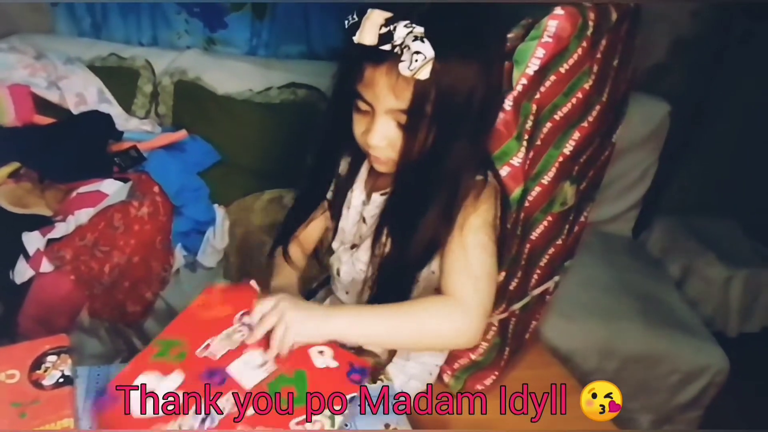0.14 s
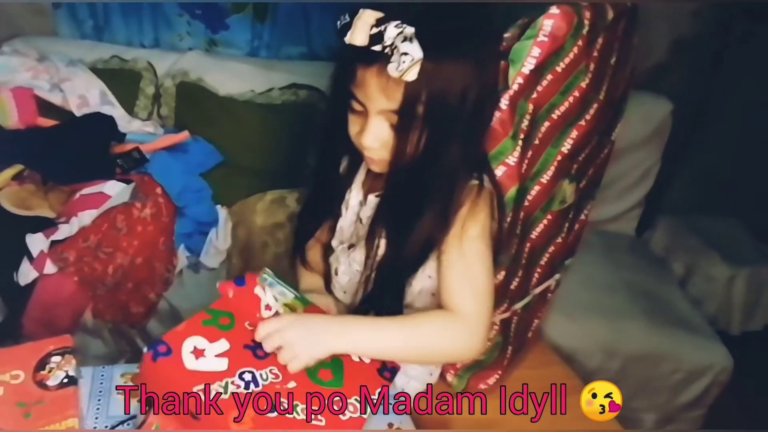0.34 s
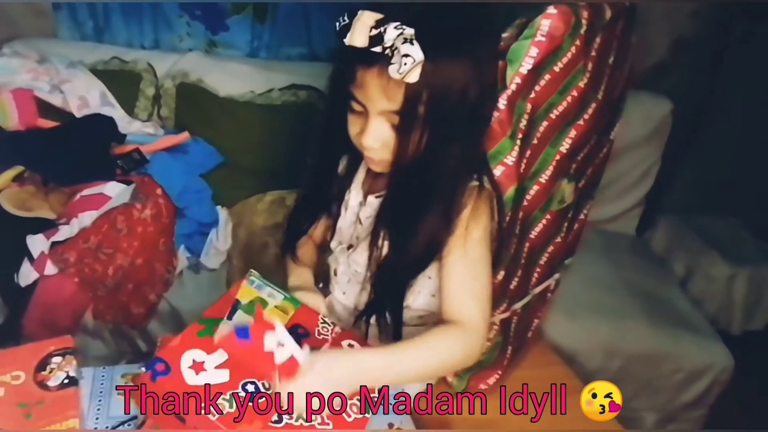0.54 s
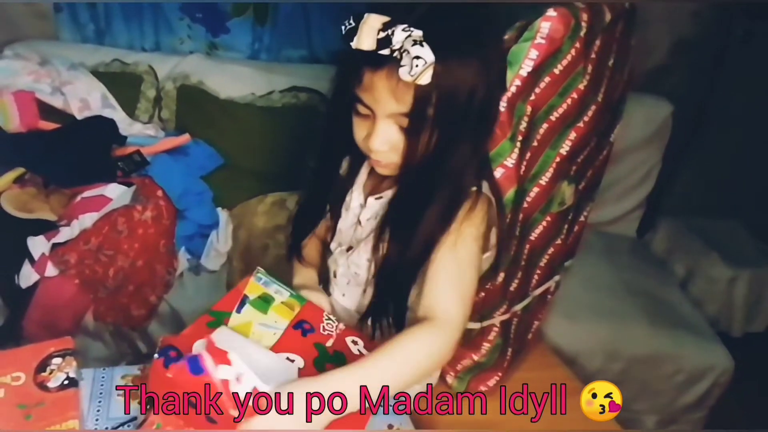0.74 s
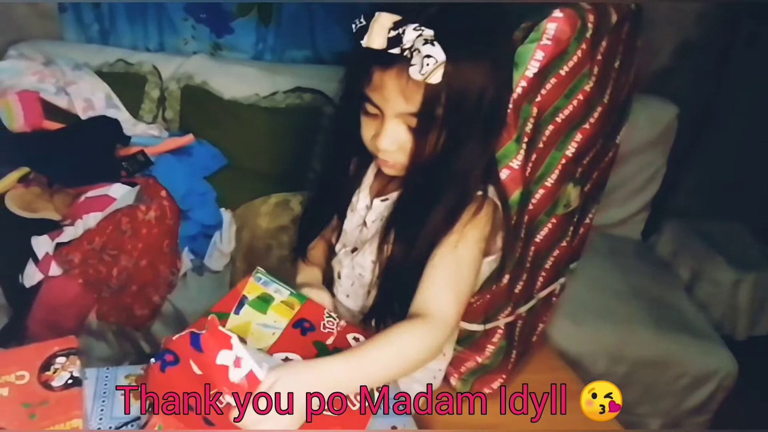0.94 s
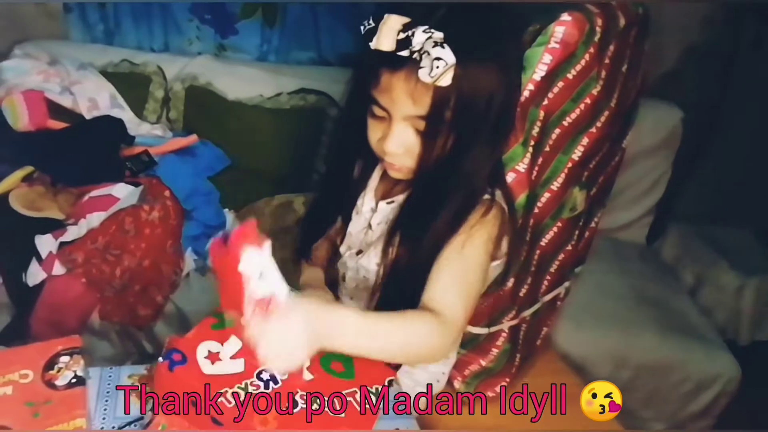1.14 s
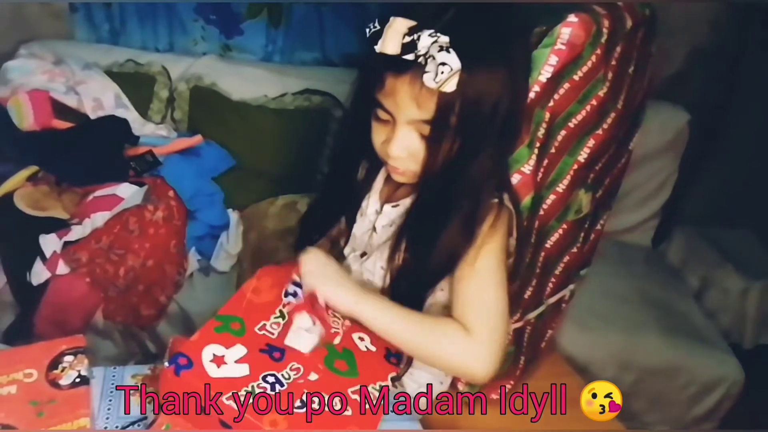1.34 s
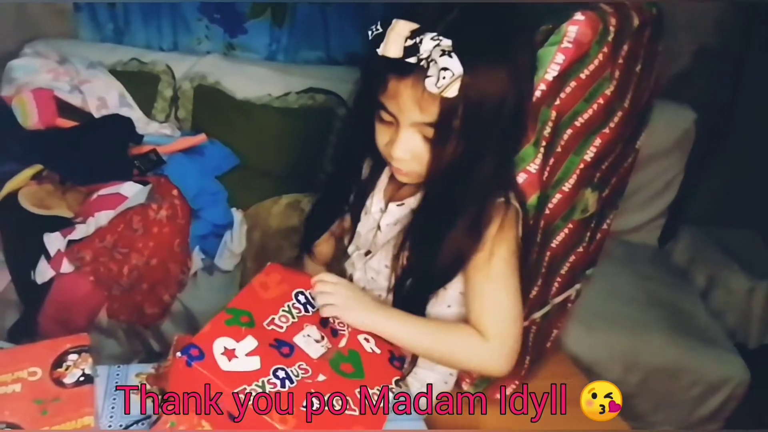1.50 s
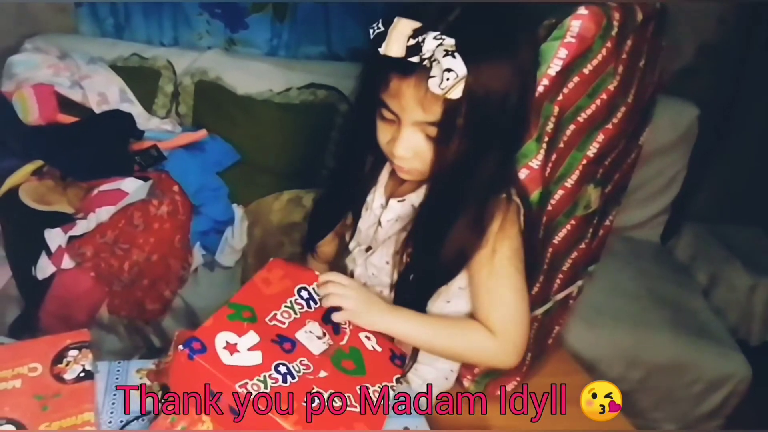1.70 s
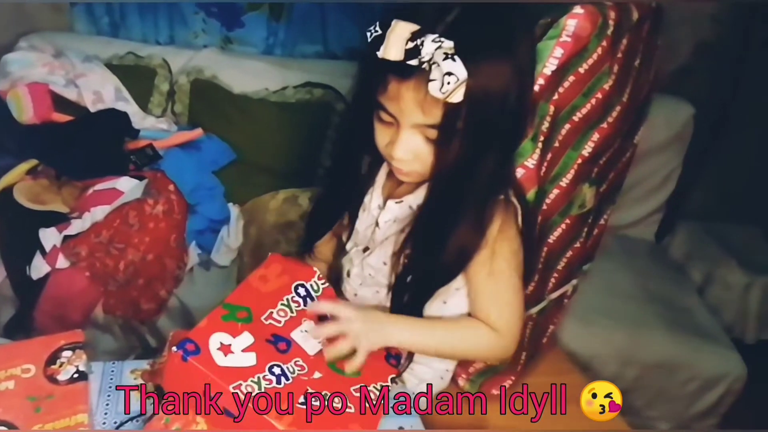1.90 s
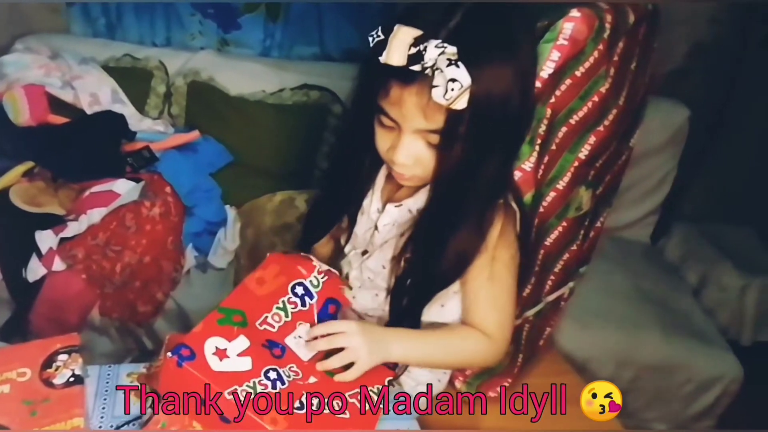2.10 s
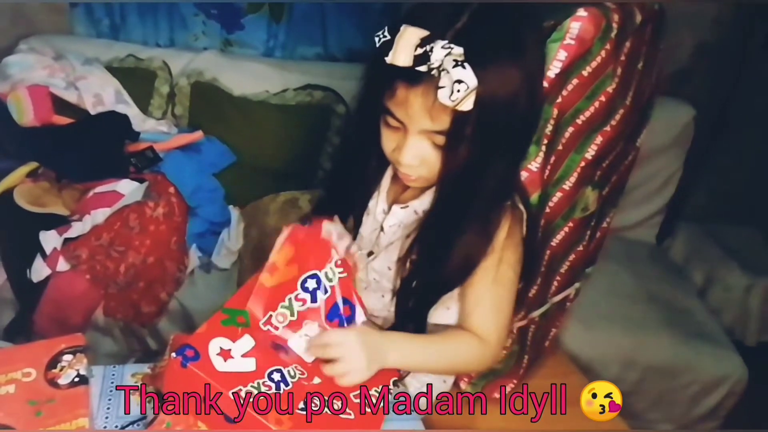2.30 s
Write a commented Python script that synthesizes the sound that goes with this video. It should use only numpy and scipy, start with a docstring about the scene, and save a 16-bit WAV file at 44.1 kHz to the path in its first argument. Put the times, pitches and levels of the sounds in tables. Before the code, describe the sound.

Wrapping paper is torn from a gift box, close and bright in a small soft room. Light crinkling leads to a loud, snapping rip at 0.25-0.3 s, then hollow pops around 0.4-0.55 s and crackly tears until 0.8 s. Another pull comes at 0.9-1.15 s, brief crinkles at 1.4-1.6 s, a faint rub from 1.6 s, a dull pop at 2.0 s and small crackles near 2.15 s. Low steady hush.

```python
"""Gift wrap torn off a box

Wrapping paper is ripped off a gift box by hand, close by in a small furnished room.
Each pull is a dense run of random fibre snaps, coloured as a bright fizz and a lower crinkle.
Single creases crack as short rings with a noisy tick; soft pops make the loose sheet flex over the box,
and buckles add hollow decaying tones. A fingertip rub sings faintly late on, and a steady hush lies below."""
import sys
import numpy as np
from scipy import signal
from scipy.fft import rfft, irfft, next_fast_len
from scipy.io import wavfile
from scipy.ndimage import uniform_filter1d

SR = 44100
rng = np.random.default_rng(int(sys.argv[2]) if len(sys.argv) > 2 else 0)


def store_wav(level_fs):
    """Save 16-bit WAV to argv[1]."""
    pcm = np.round(np.clip(np.atleast_2d(level_fs), -1, 1) * 32767)
    wavfile.write(sys.argv[1], SR, pcm.T.astype(np.int16))


N = 103635
T = np.arange(N) / SR

# Levels in the event tables are before the layer trims (*_TRIM_DB), room and ports.
# Pulls on the paper: (start [s], end [s], fizz level midway [dB], swell from start to end [dB],
# crinkle against fizz [dB], extra fizz above SPLIT_HZ [dB], left over right [dB])
PULLS = [(-.01, 0.117, -37, -2, -3.5, -2, 2), (0.142, 0.243, -35, 5, -3.5, 1, 3.5),
         (0.2447, 0.29, -18.5, -2, -6.5, -2.5, 0), (0.295, 0.388, -35, -8, -1.5, -2, -0.5),
         (0.417, 0.469, -39, 8.5, 2, -10, 0), (0.488, 0.605, -32.5, 5.5, 0, 0.5, -1),
         (0.562, 0.66, -31.5, 9, -6.5, 4, -1.5), (0.677, 0.823, -34.5, -6.5, -5, 3, -0.5),
         (0.915, 1.113, -47.5, 17, 2.5, -4, 0), (1.07, 1.155, -30, 11, -6, 1, -0.5),
         (1.38, 1.441, -47, 16.5, -2, -0.5, 0.5), (1.459, 1.495, -34, 2.5, -5, -9, 1),
         (1.512, 1.52, -30, 8.5, -3.5, -8, -1.5), (1.574, 1.613, -47, 5.5, 1.5, -6, 1),
         (1.708, 2.127, -49.5, 7.5, -5.5, -3, -0.5), (2.125, 2.185, -38, -10, -8.5, -2.5, 1.5),
         (2.175, 2.35, -53, 8, -3.5, -1, 1.5)]
# Single creases cracking: (time [s], level [dB], ring pitch [Hz], left over right [dB])
CRACKS = [(0.1594, -24, 8300, 6), (0.191, -26.5, 3170, -8), (0.232, -24, 2940, -7), (0.2494, -16, 9800, 23),
          (0.2526, -23, 8800, -29), (0.2622, -7.5, 6170, -5), (0.2763, -15, 2580, 1),
          (0.2834, -4.5, 6040, -7), (0.286, -13, 8600, 6), (0.2944, -13, 6250, 3), (0.4945, -15, 2980, -2),
          (0.5594, -15.5, 9200, 4), (0.5938, -18.5, 8300, 5), (0.627, -14, 9990, -4),
          (0.648, -13, 9800, -2), (.938, -30.5, 2540, 4.5), (.958, -21, 9500, 0), (0.9789, -26, 2360, 5),
          (1.416, -34, 3000, 4), (1.4304, -22.5, 3050, -5), (1.4495, -28.5, 2600, -5),
          (1.7146, -37, 1430, 1), (1.9268, -33, 2830, -7), (2.0076, -38, 2610, 3.5),
          (2.077, -34.5, 8750, 10), (2.133, -24, 9500, 14.5), (2.1577, -33, 2320, 4),
          (2.172, -21.5, 9360, 4.5)]
# The loose sheet flexing: (start [s], end [s], level midway [dB], swell from start to end [dB])
FLEXES = [(0, 0.288, -47, 8), (0.356, 0.544, -33.5, 13.5), (0.6, 0.777, -46.5, 21.5),
          (0.827, 1.025, -36.5, 5.5), (1.06, 1.189, -44, 0), (1.333, 1.548, -41, 8),
          (1.6, 1.629, -35.5, -6), (1.946, 2.067, -41.5, 12), (2.272, 2.283, -48.5, -17)]
# The sheet buckling against the box: (time [s], level [dB], pop pitch [Hz])
BUCKLES = [(.159, -22.5, 700), (.190, -23.5, 690), (.396, -25.5, 830), (.438, -22, 740), (.45, -25, 735),
           (.467, -21, 507), (0.4794, -20, 585), (0.4931, -16, 613), (.529, -19, 545), (.539, -16.5, 710),
           (.829, -27, 605), (.904, -34, 685), (0.9508, -26.5, 605), (0.9706, -20, 735), (1.0228, -21, 700),
           (1.532, -24.5, 450), (1.6, -28, 633), (2.0077, -13.5, 550), (2.052, -28, 795), (2.112, -29, 800)]
# Hollow ring of the box: (pitch [Hz], level against the pop [dB], time to fall 60 dB [s])
BOX_RING = [(274, -25, 0.075), (465, -15.5, 0.13), (541, -24, 0.082), (720, -15.5, 0.027)]
# A fingertip sliding on the taut sheet: (start [s], end [s], level midway [dB], swell [dB])
RUB = (1.62, 1.91, -56, -1)
# Colour of the snapping fibres: (frequency [Hz], relative level [dB])
FIZZ_COLOUR = [(3500, -20), (4100, -10), (5200, -4), (6200, -5), (7600, -9), (8800, 4), (10000, -2),
               (10800, -8.5), (14500, -13.5), (15700, -13.5)]
# Colour of the crinkling folds: (frequency [Hz], relative level [dB])
CRINKLE_COLOUR = [(110, -10.5), (270, 1), (700, 0.5), (1150, -7), (1700, -1.5), (2400, 2.5), (3050, 3.5),
                  (3600, -3.5), (4200, -11)]
# Colour of the soft flexing pops: (frequency [Hz], relative level [dB])
RUSTLE_COLOUR = [(110, -35), (190, -10), (265, -3), (380, -4.5), (530, -1), (820, -4), (1050, -11),
                 (1350, -13.5)]
# Two narrow resonances of the rub: (frequency [Hz], relative level [dB])
RUB_COLOUR = [(2400, -18), (2590, 1), (2850, -16), (4600, -24), (5030, -11)]
# Colour of the steady hush: (frequency [Hz], relative level [dB])
HUSH_COLOUR = [(25, 0.5), (270, 1.5), (650, 0), (1500, -11), (2600, -7), (3900, -16.5), (9000, -15.5),
               (15000, -29)]
# Colour difference of the two microphone ports: (frequency [Hz], left over right [dB])
PORTS = [(600, 0.5), (1700, 1), (2400, 7.5), (3100, 3.5), (4200, -3), (6100, -1.5), (7400, 0.5), (8900, 1),
         (10200, 0.5), (14700, 6.5)]
# Tone of all cracks together: (frequency [Hz], gain [dB])
CRACK_COLOUR = [(500, 5), (2700, 9.0), (4000, -1), (6000, 4.5), (9000, 3.0), (12000, 1.5)]
# How much left-right difference survives at close ports: (frequency [Hz], gain [dB])
SIDE_COLOUR = [(500, -32.5), (1400, 0.5)]

FIZZ_TRIM_DB, CRINKLE_TRIM_DB, RUSTLE_TRIM_DB = 0.5, 0.5, -3.5
CRACK_TRIM_DB, BUCKLE_TRIM_DB, HUSH_DB = 2, -1.5, -51
SPLIT_HZ = 7340  # the fizz above this gets its own level
PULL_ATTACK_S, PULL_RELEASE_S = .006, 0.025
FLEX_ATTACK_S, FLEX_RELEASE_S = 0.015, 0.013
CRACK_RISE_S, CRACK_RING_S, CRACK_TICK_S = 0.00054, 0.00074, 0.0021  # time constants
TICK_DB, TICK_SLOPE_DB_PER_OCT = -6.5, 7  # tick level before the crack level; fall either side of pitch
POP_S = 0.00097  # time for a buckle's pop to swell to its peak
ROOM_T60_S, ROOM_GAP_S = 0.25, 0.0068
ROOM_PAPER_DB, ROOM_BODY_DB = -8, -5.5
TOP_HZ = 15800


def tearing():
    """Fibres snap in a bright fizz while the sheet crinkles; the larger snaps and catches sound in both."""
    large = snaps(per_s=600, spread_db=3.1, decay_s=.0007)
    catches = snaps(per_s=110, spread_db=2, decay_s=.005)
    shared = large + .4 * catches
    fibres = shared + snaps(per_s=2200, spread_db=3.5, decay_s=.0004)
    folds = shared + .9 * snaps(per_s=450, spread_db=3, decay_s=.0014)

    fizz_power = top_power = crinkle_power = 0
    for start, end, db, swell_db, crinkle_db, top_db, pan_db in PULLS:
        pull = stroke(start, end, db, swell_db, PULL_ATTACK_S, PULL_RELEASE_S)
        power = pan(pull, 2 * pan_db)  # doubled because this is power
        fizz_power = fizz_power + power
        top_power = top_power + power * undb(top_db) ** 2
        crinkle_power = crinkle_power + power * undb(crinkle_db) ** 2

    grain = unit(colour(np.sqrt(fibres) * noise(0.031), FIZZ_COLOUR))
    highpass = signal.butter(4, SPLIT_HZ, "high", fs=SR, output="sos")
    top = signal.sosfiltfilt(highpass, grain)
    fizz = (grain - top) * np.sqrt(fizz_power) + top * np.sqrt(top_power)
    creasing = unit(colour(np.sqrt(folds) * close_bass(noise(0.36)), CRINKLE_COLOUR))
    crinkle = creasing * np.sqrt(crinkle_power)
    return fizz * undb(FIZZ_TRIM_DB) + crinkle * undb(CRINKLE_TRIM_DB)


def cracks():
    """A crease flips: a very short ring of the facet beside it, and a broad tick around that pitch."""
    out, t = np.zeros((2, N)), T[:1024]
    f = np.maximum(np.fft.rfftfreq(len(t), 1 / SR), 1)
    rise = 1 - np.exp(-t / CRACK_RISE_S)
    for at, db, hz, pan_db in CRACKS:
        phase = 0.82 * rng.standard_normal((2, 1))  # differs left to right
        ring = np.sin(2 * np.pi * hz * t + phase) * np.exp(-t / CRACK_RING_S)
        tilt = undb(-TICK_SLOPE_DB_PER_OCT * np.abs(np.log2(f / hz)))
        grit = irfft(rfft(noise(0.057, size=len(t))) * tilt)
        tick = unit(grit) * np.exp(-t / CRACK_TICK_S)
        crack = (ring + undb(TICK_DB) * tick) * rise
        add(out, at, pan(undb(db + CRACK_TRIM_DB) * crack, pan_db))
    return colour(out, CRACK_COLOUR, closed=False)


def buckles():
    """The sheet gives way with a hollow pop of a few cycles, and the box rings on faintly."""
    out, t = np.zeros((2, N)), T[:4000]
    hz, db, t60 = np.array(BOX_RING).T[:, :, None]
    for at, peak_db, pop_hz in BUCKLES:
        pop = np.sin(2 * np.pi * pop_hz * t) * t / POP_S * np.exp(1 - t / POP_S)
        swing = np.sin(2 * np.pi * (hz * t + rng.random(hz.shape)))
        modes = undb(db) * swing * np.exp(-np.log(1000) * t / t60)
        ring = np.sum(modes, axis=0) * (1 - np.exp(-t / POP_S))
        add(out, at, (pop + ring)[None] * undb(peak_db + BUCKLE_TRIM_DB))
    return out


def flexing():
    """Many soft little pops as the sheet bends and drags over the box."""
    power = sum(stroke(start, end, db, swell_db, FLEX_ATTACK_S, FLEX_RELEASE_S)
                for start, end, db, swell_db in FLEXES)
    pops = snaps(per_s=330, spread_db=1.7, decay_s=.002)
    rustle = unit(colour(np.sqrt(pops) * noise(0.88), RUSTLE_COLOUR))
    return rustle * np.sqrt(power) * undb(RUSTLE_TRIM_DB)


def rubbing():
    """Friction sings faintly in two narrow resonances."""
    start, end, db, swell_db = RUB
    song = unit(colour(noise(0.44), RUB_COLOUR))
    return song * np.sqrt(stroke(start, end, db, swell_db, FLEX_ATTACK_S, FLEX_RELEASE_S))


def room(x, wet_db, likeness):
    """Add the short diffuse tail of a furnished room: decaying noise after a small gap."""
    t = T[:SR // 2]
    decay = np.exp(-np.log(1000) * t / ROOM_T60_S)
    tail = noise(likeness, size=len(t)) * decay * (t > ROOM_GAP_S)
    tail = tail / np.sqrt(np.sum(tail ** 2) / 2)
    return x + undb(wet_db) * signal.fftconvolve(x, tail, axes=1)[:, :N]


def background_hush():
    """A faint steady hush of coloured noise."""
    return unit(colour(noise(0.53), HUSH_COLOUR)) * undb(HUSH_DB)


def stroke(start, end, db, swell_db, attack_s, release_s):
    """Power of one hand movement: it takes hold, swells or eases, and lets go."""
    along = np.clip((T - start) / max(end - start, .01), 0, 1)
    attack = np.clip((T - start) / attack_s + .5, 0, 1)
    release = np.exp(-np.maximum(T - end, 0) / release_s)
    return (attack * release * undb(db + swell_db * (along - .5))) ** 2


def snaps(per_s, spread_db, decay_s):
    """Power of a run of random snaps: instant attack, quick decay, many weak and few strong."""
    hit = rng.random(N) < per_s / SR
    size = undb(spread_db * np.minimum(rng.exponential(size=N), 4))
    decay = np.exp(-1 / (decay_s * SR))
    power = signal.lfilter([1], [1, -decay], hit * size ** 2) + 1e-9
    local_mean = uniform_filter1d(power, size=1500)  # evens out the run over 34 ms
    return power / np.maximum(local_mean, 1e-9)


def close_bass(x):
    """Long waves reach both ports alike, so the left-right difference loses its bass."""
    side = colour((x[0] - x[1]) / 2, SIDE_COLOUR, closed=False)
    return x.mean(axis=0) + np.array([side, -side])


def noise(likeness, size=N):
    """Left and right noise, correlated by likeness."""
    c = np.clip(likeness, -.99, .99)
    mid, side = rng.standard_normal((2, size))
    return (np.sqrt(1 + c) * mid + np.sqrt(1 - c) * side * np.array([[1], [-1]])) / np.sqrt(2)


def colour(x, points, closed=True):
    """Minimum-phase filter through (Hz, dB) points; closed ends fall 60 dB per octave, by 70 dB at most."""
    hz, db = np.array(points, float).T
    size = 2 * next_fast_len(N)
    octave, knots = np.log2(np.maximum(np.fft.rfftfreq(size, 1 / SR), 1)), np.log2(hz)
    gain_db = np.interp(octave, knots, db)
    if closed:
        outside = np.abs(octave - np.clip(octave, knots[0], knots[-1]))
        gain_db = gain_db - np.minimum(60 * outside, 70)
    # Folding the cepstrum forward in time makes the filter causal.
    cepstrum = irfft(np.log(undb(gain_db)))
    cepstrum[1:size // 2] *= 2
    cepstrum[size // 2 + 1:] = 0
    return irfft(rfft(x, size) * np.exp(rfft(cepstrum)))[..., :N]


def pan(x, db):
    """Place a sound by its left-right level difference."""
    return x * undb(np.array([db, -db]).reshape(2, -1) / 2)


def add(out, at_s, x):
    """Mix a short sound in at a time."""
    i = int(at_s * SR)
    out[:, i:i + x.shape[1]] += x[:, :N - i]


def undb(db):
    """Decibels to gain."""
    return 10 ** (np.asarray(db) / 20)


def unit(x):
    """Scale to an rms of 1."""
    return x / np.sqrt(np.mean(x ** 2))


def scene():
    """Paper and box in the room, with the rub and the hush left dry."""
    paper = room(tearing() + cracks(), ROOM_PAPER_DB, likeness=0.036)
    body = room(flexing() + buckles(), ROOM_BODY_DB, likeness=0.45)
    return paper + body + rubbing() + background_hush()


def record(dry):
    """The two ports colour the sound differently; the highest peaks are rounded and the top is cut."""
    left = colour(dry[0], [(hz, db / 2) for hz, db in PORTS], closed=False)
    right = colour(dry[1], [(hz, -db / 2) for hz, db in PORTS], closed=False)
    rounded = .8 * np.tanh(np.array([left, right]) / .8)
    lowpass = signal.ellip(10, .2, 80, TOP_HZ, fs=SR, output="sos")
    return signal.sosfilt(lowpass, rounded)


dry = scene()
out = record(dry)
store_wav(out)
```